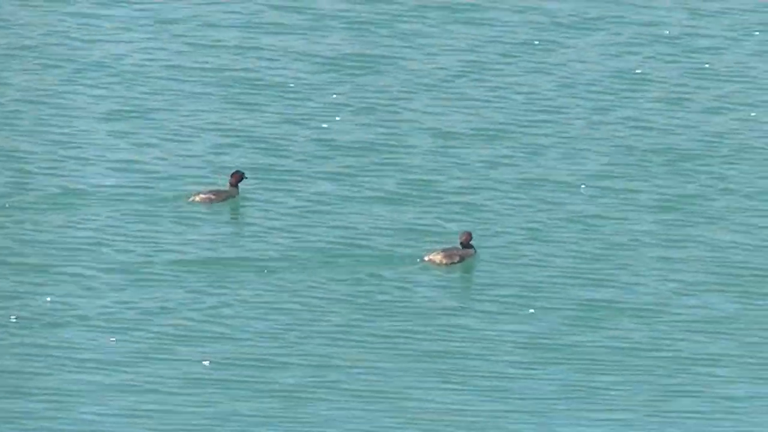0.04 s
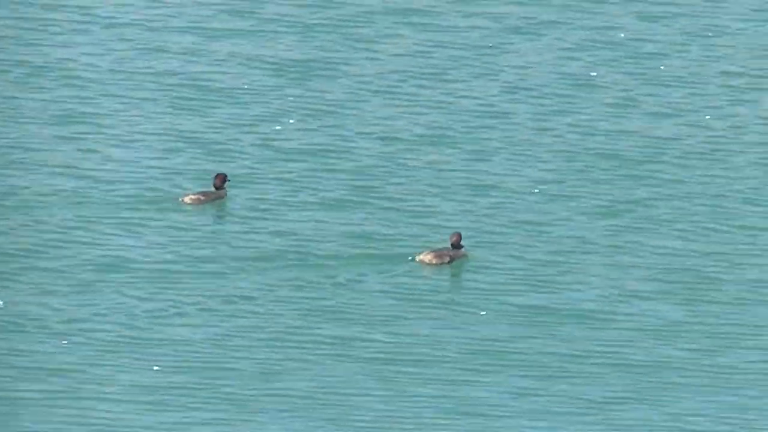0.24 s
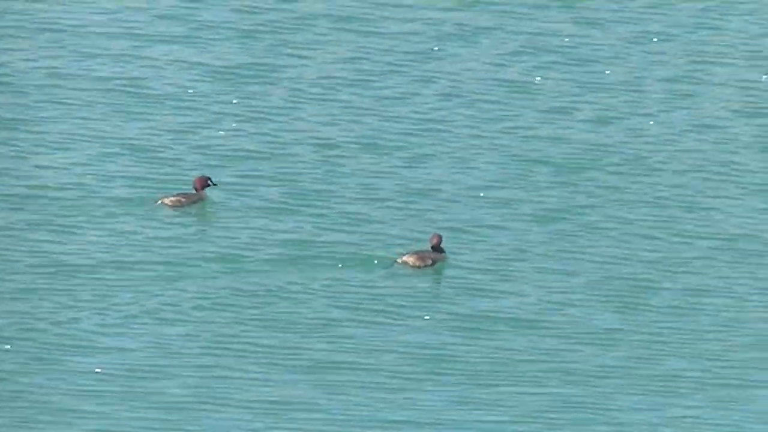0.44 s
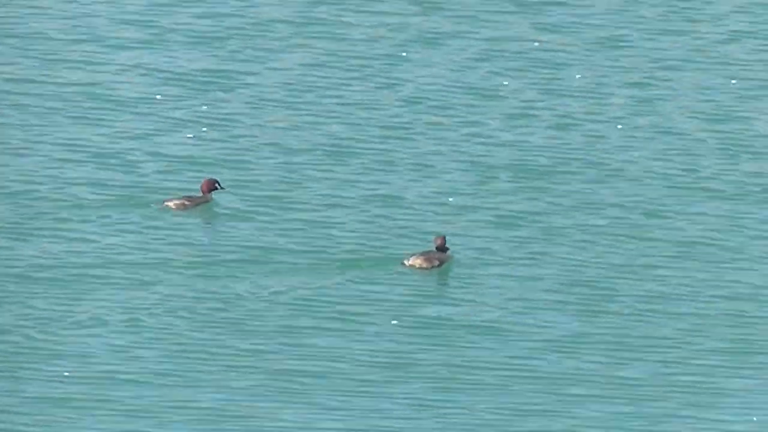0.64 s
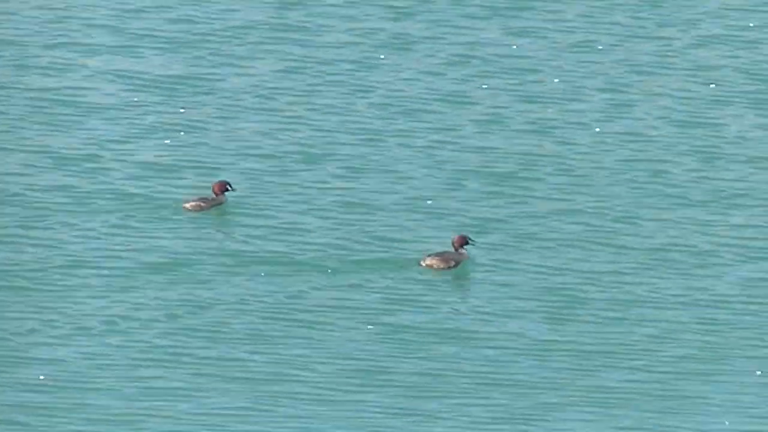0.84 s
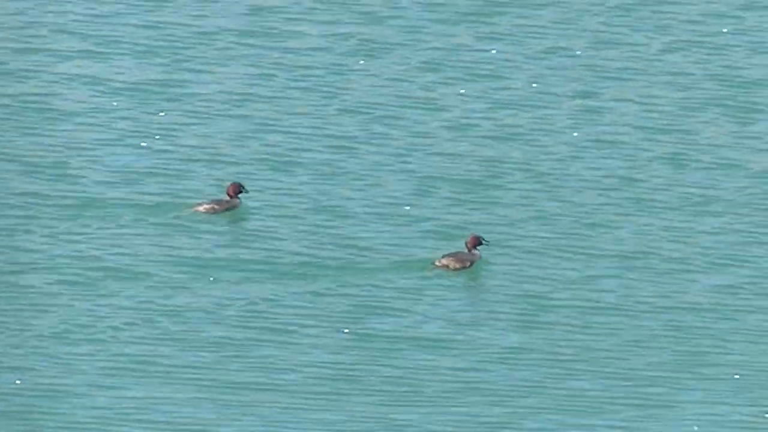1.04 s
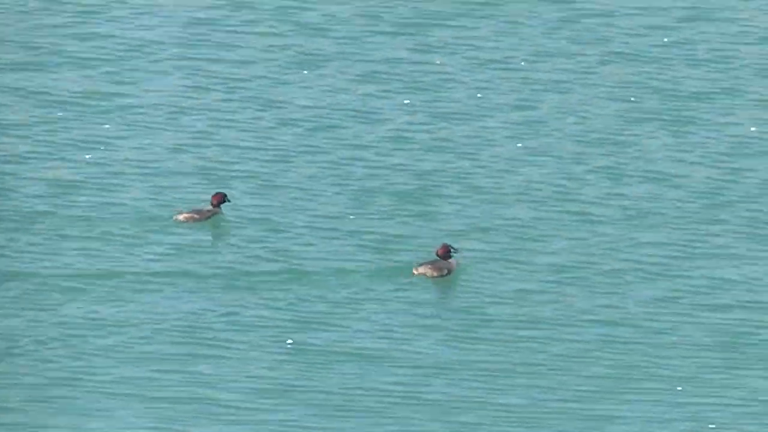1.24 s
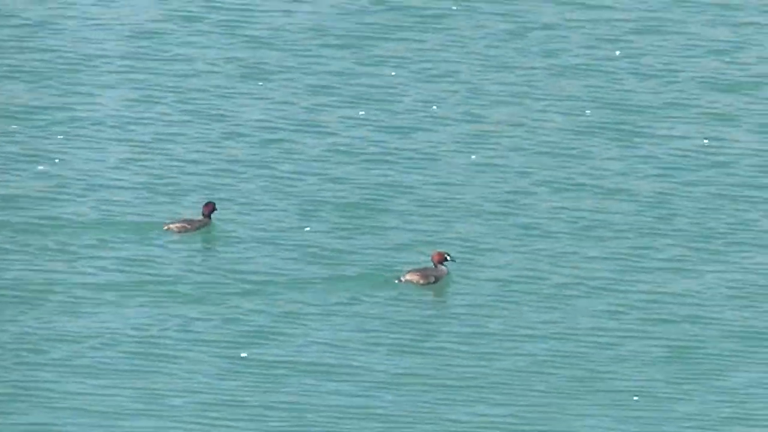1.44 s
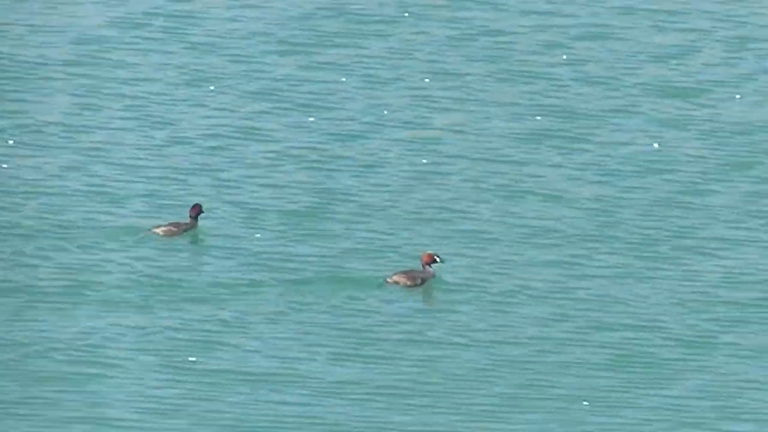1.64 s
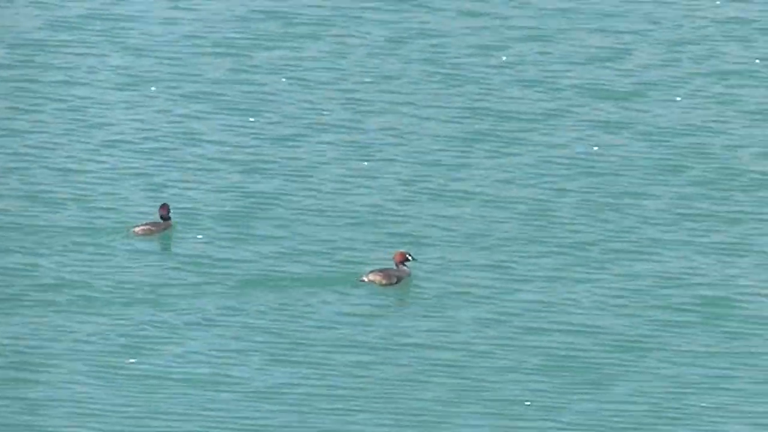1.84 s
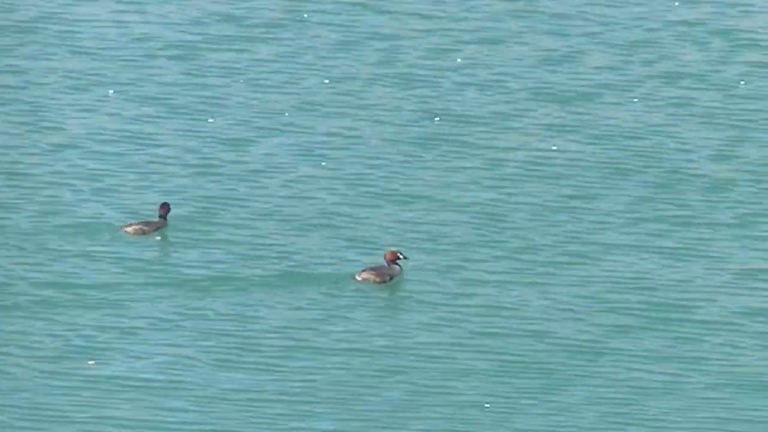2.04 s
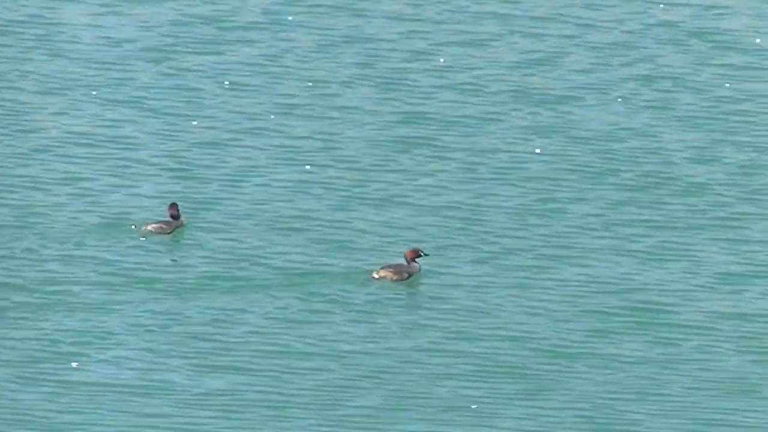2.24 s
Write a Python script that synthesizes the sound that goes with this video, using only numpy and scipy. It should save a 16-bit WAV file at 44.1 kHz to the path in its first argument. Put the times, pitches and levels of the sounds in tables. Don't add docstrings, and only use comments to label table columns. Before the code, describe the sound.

Fast whinnying bird trill, two voices interleaved almost into a buzz, starts faintly, peaks past the middle and trails off; quiet constant outdoor hiss beneath, slight echo from far banks, microphone at a moderate distance.

```python
import sys
import numpy as np
from scipy import signal
from scipy.fft import rfft, irfft, next_fast_len
from scipy.io import wavfile
from scipy.ndimage import uniform_filter1d, map_coordinates

SR = 44100
rng = np.random.default_rng(int(sys.argv[2]) if len(sys.argv) > 2 else 0)


def natural_amplitude(level_db):
    exponent = np.asarray(level_db, float) / 20
    return 10 ** exponent


def store_wav(level_fs):
    pcm = np.round(np.clip(np.atleast_2d(level_fs), -1, 1) * 32767)
    wavfile.write(sys.argv[1], SR, pcm.T.astype(np.int16))


N = 101430

# multiple of the pitch, level/dB relative to the second partial
HIGH_WEAK = [(1, -31), (4, -30), (9, -43), (10, -38), (11, -41)]
HIGH_VOICE = dict(attack_s=.007, release_s=.0075, sag_db=3.5,
                  rasp_lead_s=.006, rasp_spread_s=.0035, rasp_hz=3100, rasp_width_hz=500,
                  rasp_start_db=-11.5, rasp_end_db=-20, rasp_held_db=-23)


def unit(x):
    return x / np.sqrt(np.mean(x ** 2) + 1e-20)


def wobble(rate, size):
    points = rng.standard_normal(int(size * rate / SR) + 4)
    return map_coordinates(points, [np.arange(size) * rate / SR])


def ramp(u):
    return np.sin(np.pi / 2 * np.clip(u, 0, 1)) ** 2


def filtered(x, response):
    size = next_fast_len(N + 8192)
    return irfft(rfft(x, size) * response(np.fft.rfftfreq(size, 1 / SR)), size)[..., :N]


def rush(spectrum, patchy_db):
    noise = signal.stft(rng.standard_normal(N), nperseg=512)[2]
    patches = uniform_filter1d(rng.standard_normal(noise.shape), 6, 0)
    patches = unit(uniform_filter1d(patches, 12, 1))
    patchy = signal.istft(noise * natural_amplitude(patchy_db * patches), nperseg=512)[1][:N]
    f, db = np.transpose(spectrum)
    colour = lambda hz: natural_amplitude(np.interp(np.log(hz + 1), np.log(f + 1), db))
    return unit(filtered(patchy, colour))


def pond():
    # f/Hz, level per Hz/dB
    hiss = [(110, -37), (300, -11), (700, -2), (1700, -8), (3200, -4), (4900, -3), (5600, -13.5),
            (16000, -70)]
    # f/Hz, level per Hz/dB
    hiss_side = [(76, -53), (130, -17), (400, -1), (520, 0), (760, -1.5), (946, 1.3), (6500, -14),
                 (9100, -28.5), (15400, -36)]
    # f/Hz, level per Hz/dB
    deep = [(20, -1), (60, 1.5), (150, 1.5), (400, -20)]
    # f/Hz, level per Hz/dB
    air = [(4800, -25), (5500, -2), (6800, 1), (7700, -2), (8500, -4), (9300, -8.5), (12000, -12.5),
           (15800, -15)]
    patchy_db = 0.74
    swell_db = .35 * wobble(3.3, N)
    mid = natural_amplitude(-50.5 + swell_db) * rush(hiss, patchy_db)
    mid = mid + natural_amplitude(-89.5) * rush(deep, 1.1)
    mid = mid + natural_amplitude(-58.5) * rush(air, .5)
    side = natural_amplitude(-60.5) * rush(hiss_side, patchy_db) + natural_amplitude(-81) * rush(deep, 1.1)
    return np.array([mid + side, mid - side])


def bird(calls, weak, windpipe, scoop, scoop_s, drift, drop, drop_s, attack_s, release_s, sag_db,
         rasp_lead_s, rasp_spread_s, rasp_hz, rasp_width_hz, rasp_start_db, rasp_end_db, rasp_held_db):
    leg_s, leg_db = .006, -14
    snap_s, tiring_s = 2.1, 1.27
    out = np.zeros(N + SR)
    t = np.arange(-600, 2200) / SR

    def lift_db(hz):
        return sum(db / (1 + ((hz - centre) / width) ** 2) for centre, width, db in windpipe)

    def puff(at, db):
        return natural_amplitude(db + rng.normal(0, 1.8)) * np.exp(-((t - at) / rasp_spread_s) ** 2)

    for start, length, hz, second_db, third_db in calls:
        rise_s = scoop_s * np.exp(-start / snap_s)
        bend = -scoop * np.exp(-np.clip(t, -leg_s, 1) / rise_s)
        bend = bend + drift * np.exp(-start / tiring_s) * (t - length / 2)
        bend = np.maximum(bend, -.3)
        bend = bend - drop * np.exp(np.clip(t - length, -1, leg_s / 2) / drop_s)
        bend = bend + .004 * wobble(252, t.size)
        pitch = hz * (1 + bend)
        phase = 2 * np.pi * np.cumsum(pitch) / SR

        env = ramp(t / attack_s + 0.29) * ramp((length - t) / release_s + 0.39)
        env = env * natural_amplitude(-sag_db * (t / length - .5))
        legs = ramp(2 * (t / leg_s + 1)) * ramp(2 * ((length - t) / leg_s + 1))
        env = env + natural_amplitude(leg_db) * legs

        partials = [(2, second_db), (3, third_db)]
        for k, db in weak:
            bright_db = .5 * (third_db - second_db) if k > 3 else 0
            partials.append((k, second_db + db + bright_db + rng.normal(0, 1.8)))
        note = 0
        for k, db in partials:
            flutter_db = 1.1 * (1.4 if k > 2 else 1) * wobble(170, t.size)
            gain_db = db + lift_db(k * pitch) - lift_db(k * hz) + flutter_db
            rough = 1 + natural_amplitude(-19) * wobble(1502, t.size)
            tone = np.sin(k * phase + rng.uniform(0, 2 * np.pi))
            note = note + np.sqrt(2) * natural_amplitude(gain_db) * rough * tone

        breath = 2 * wobble(2 * rasp_width_hz, t.size)
        breath = breath * np.sin(2 * np.pi * rasp_hz * rng.uniform(.93, 1.07) * t)
        rasp = puff(-rasp_lead_s, rasp_start_db) + puff(length + rasp_lead_s, rasp_end_db)
        rasp = rasp + natural_amplitude(rasp_held_db) * env
        rasp_db = (second_db + max(second_db, third_db)) / 2
        first = round((start + t[0]) * SR)
        out[first:first + t.size] += env * note + natural_amplitude(rasp_db) * breath * rasp
    return out[:N]


def lower_bird():
    # t/s, length/s, pitch f/Hz,
    # second partial level/dB, third partial level/dB
    low_calls = [(0.152, 0.018, 1410, -54.5, -65), (0.221, 0.014, 1036, -57, -52.5),
                 (0.289, 0.017, 1152, -49.5, -49), (0.356, 0.019, 1238, -45.5, -46.5),
                 (0.423, 0.019, 1288, -44, -49.5), (0.489, 0.023, 1294, -41.5, -45),
                 (0.554, 0.022, 1254, -40, -45.5), (0.62, 0.025, 1237, -41, -40.5),
                 (0.685, 0.027, 1248, -41, -40.5), (0.75, 0.026, 1293, -41, -41.5),
                 (0.817, 0.019, 1332, -39.5, -34.5), (0.885, 0.017, 1350, -38, -33.5),
                 (0.949, 0.017, 1249, -44, -37), (1.016, 0.015, 1236, -42.5, -38.5),
                 (1.081, 0.015, 1220, -44.5, -38), (1.147, 0.017, 1228, -44.5, -39),
                 (1.212, 0.014, 1258, -41.5, -49), (1.277, 0.016, 1242, -41, -44.5),
                 (1.344, 0.019, 1205, -41, -42.5), (1.411, 0.014, 1212, -40.5, -41.5),
                 (1.479, 0.012, 1207, -41.5, -43), (1.548, 0.015, 1150, -46.5, -47),
                 (1.622, 0.014, 1036, -56, -50), (1.69, 0.016, 1005, -58, -56),
                 (1.871, 0.014, 1156.0, -48, -55), (2.032, 0.0071, 1110, -62, -51)]
    # multiple of the pitch, level/dB relative to the second partial
    low_weak = [(1, -16), (4, -16), (5, -18), (6, -33), (9, -38), (10, -37)]
    # f/Hz, width/Hz, level/dB
    low_pipe = [
        (1850, 220, -12),
        (3300, 250, 2.5),
    ]
    return bird(low_calls, low_weak, low_pipe,
                scoop=.09, scoop_s=.0022, drift=-.6, drop=.08, drop_s=.0022,
                attack_s=.0068, release_s=.007, sag_db=2,
                rasp_lead_s=.003, rasp_spread_s=.004, rasp_hz=3400, rasp_width_hz=500,
                rasp_start_db=-13, rasp_end_db=-13, rasp_held_db=-13.5)


def faint_slurs():
    # t/s, length/s, pitch f/Hz, second partial level/dB, third partial level/dB
    faint_calls = [
        (.25, 0.017, 1370, -52, -61),
        (1.76, 0.018, 1533, -52, -60),
        (1.86, .016, 1540, -51, -70),
        (1.938, 0.0183, 1420, -54, -66),
        (2.016, 0.017, 1470, -52.5, -65),
    ]
    return bird(faint_calls, HIGH_WEAK, [], scoop=.17, scoop_s=.011, drift=4.5, drop=.02, drop_s=.004,
                **HIGH_VOICE)


def higher_bird():
    # t/s, length/s, pitch f/Hz, second partial level/dB, third partial level/dB
    high_calls = [(0.32, 0.018, 1340, -45, -42.5), (0.386, 0.019, 1379, -40.5, -41),
                  (0.454, 0.022, 1460, -37, -40.5), (0.519, 0.021, 1477, -38, -40),
                  (0.584, 0.026, 1478, -37.5, -38), (0.652, 0.021, 1545, -37.5, -50.5),
                  (0.716, 0.019, 1562, -39.5, -54), (0.781, 0.021, 1535, -40.5, -52),
                  (0.846, 0.02, 1572, -38.5, -53), (0.911, 0.021, 1550, -36.5, -51),
                  (0.976, 0.024, 1494, -37, -42.5), (1.043, 0.016, 1486, -34.5, -40.5),
                  (1.107, 0.017, 1436, -34, -46), (1.173, 0.019, 1447, -32, -47),
                  (1.24, 0.015, 1431, -31.2, -47), (1.309, 0.018, 1467, -35.5, -43.5),
                  (1.378, 0.012, 1483, -36, -43.5), (1.445, 0.01, 1450, -32, -48),
                  (1.51, 0.016, 1420, -32, -48.5), (1.581, 0.014, 1329, -37.5, -46),
                  (1.649, 0.018, 1326, -41.5, -46), (1.72, 0.016, 1261, -41, -47.5),
                  (1.793, 0.017, 1250, -40, -47)]
    # f/Hz, width/Hz, level/dB
    high_pipe = [
        (2850, 230, 8),
        (4450, 100, 8),
        (4720, 170, -15),
    ]
    return bird(high_calls, HIGH_WEAK, high_pipe, scoop=.065, scoop_s=.006, drift=2.4, drop=.02, drop_s=.003,
                **HIGH_VOICE)


def place(high, low):
    # t/s, level/dB on the left (opposite on the right)
    turning = [(.3, -1.4), (.9, -1.5), (1.2, -1.4), (1.55, -1.3), (1.8, -1.1)]
    pan_db = np.interp(np.arange(N) / SR, *np.transpose(turning))
    lower_band = lambda hz: 1 / (1 + (hz / 3800) ** 10)
    lean = filtered(high * (natural_amplitude(pan_db) - 1), lower_band)
    return np.array([high + lean, high - lean]) + low * natural_amplitude([[0.8], [-0.8]])


def banks(x):
    t60_s, build_up_s = .35, .015
    alike = .96
    t = np.arange(SR // 3) / SR
    tail = rng.standard_normal((2, t.size)) * natural_amplitude(-60 * t / t60_s) * ramp(t / build_up_s)
    mid, side = tail / np.linalg.norm(tail[0]) * np.sqrt([[alike], [1 - alike]])
    echo = np.array([mid + side, mid - side])
    return natural_amplitude(-13.5) * signal.fftconvolve(x[None], echo, axes=1)[:, :N]


def droplets():
    # t/s, peak level/dB
    ticks = [
        (1.6, -56),
        (1.385, -62),
        (1.657, -58),
    ]
    t = np.arange(N) / SR
    tick_s = .0012
    env = sum(natural_amplitude(db) * np.exp(-((t - start) / tick_s) ** 2) for start, db in ticks)
    bright = lambda hz: 1 / (1 + (9000 / (hz + 1)) ** 10)
    return filtered(env * rng.standard_normal(N), bright)


def scene():
    water = pond()
    low = lower_bird()
    high = faint_slurs() + higher_bird()
    return water + place(high, low) + banks(high + low) + droplets()


def band_limit(x):
    return signal.sosfilt(signal.butter(12, 16560, fs=SR, output="sos"), x)


def record(dry):
    mix = filtered(dry, lambda hz: hz < 15750)
    return band_limit(mix)


dry = scene()
out = record(dry)
store_wav(out)
```